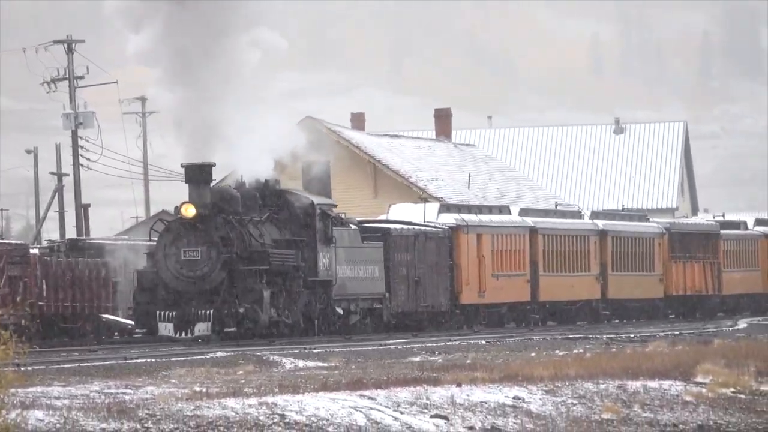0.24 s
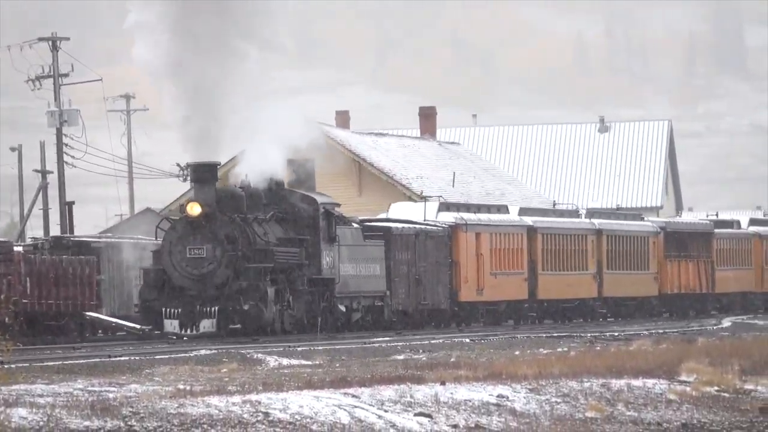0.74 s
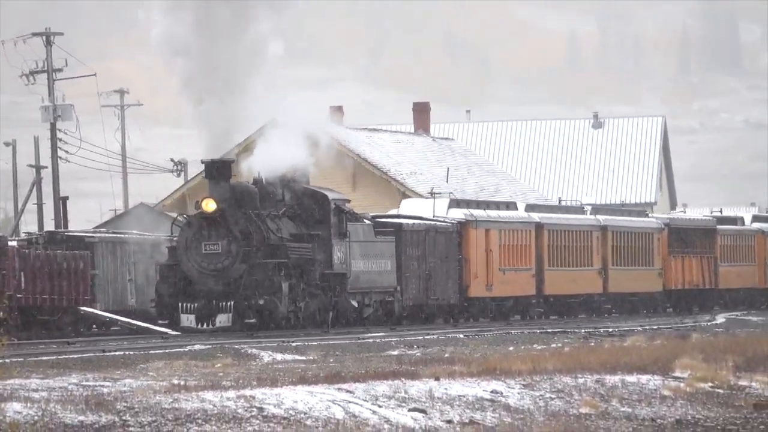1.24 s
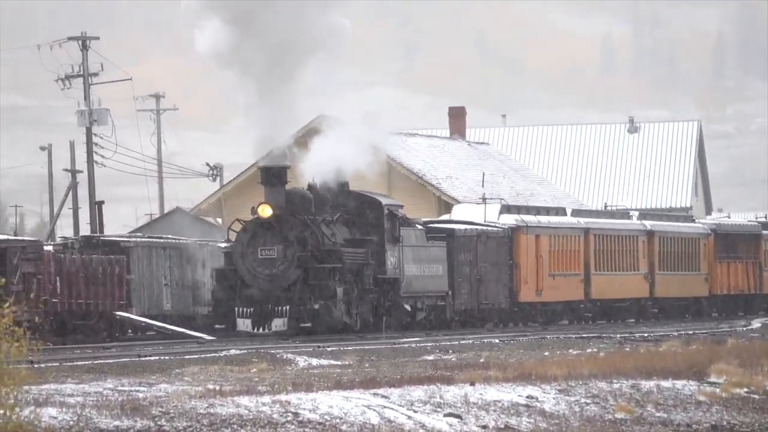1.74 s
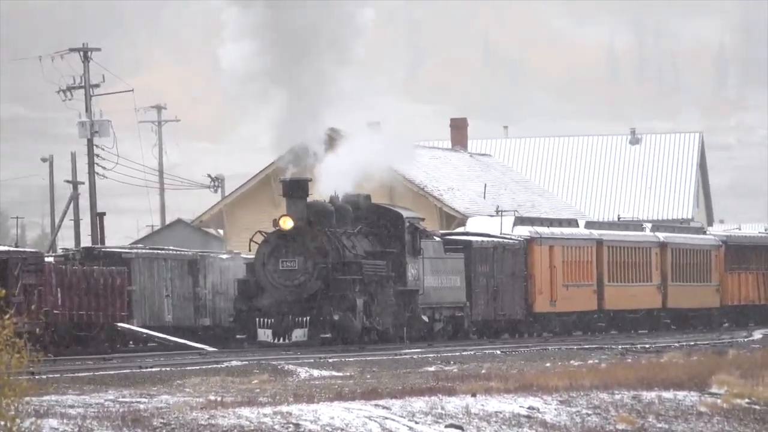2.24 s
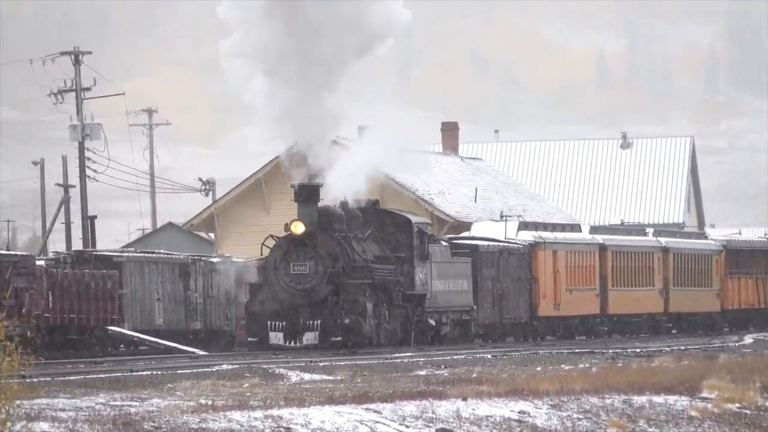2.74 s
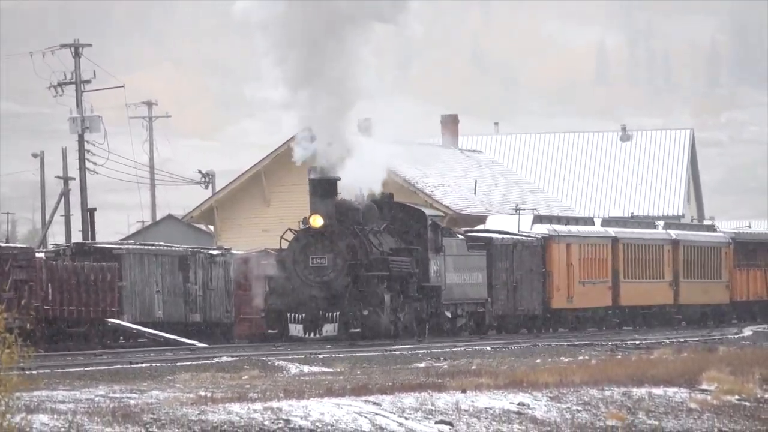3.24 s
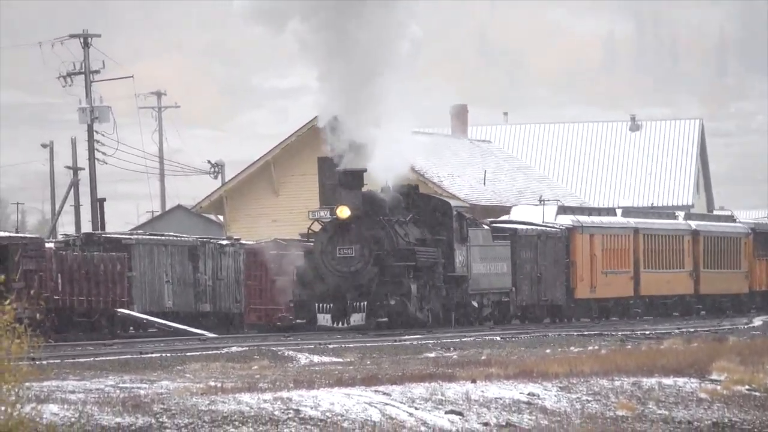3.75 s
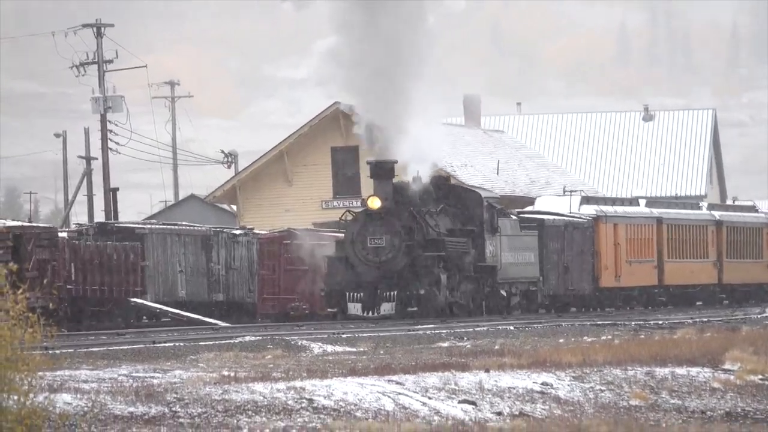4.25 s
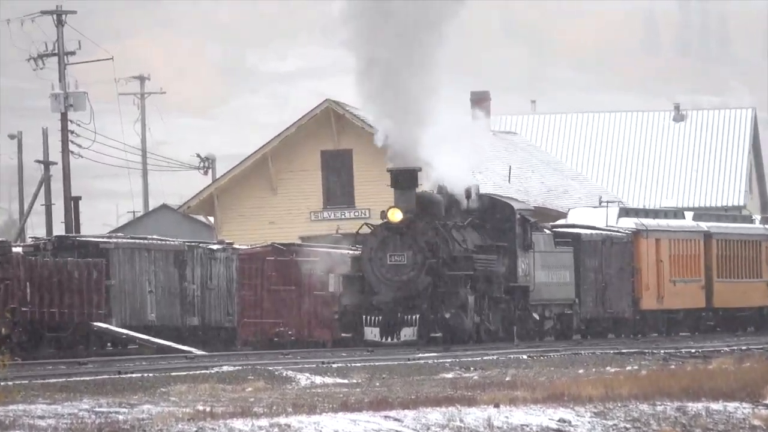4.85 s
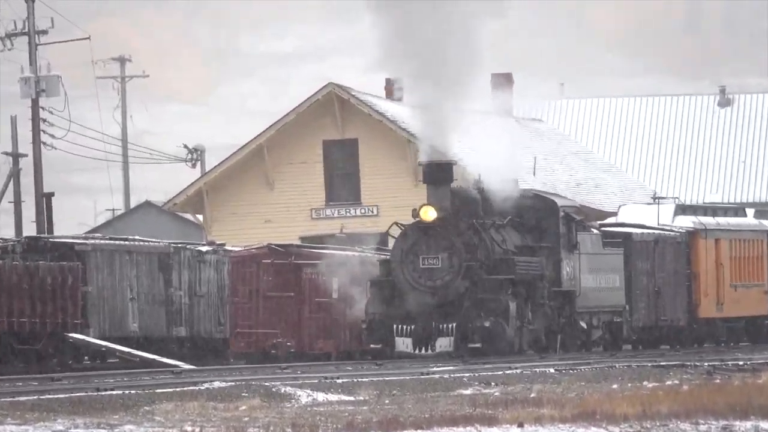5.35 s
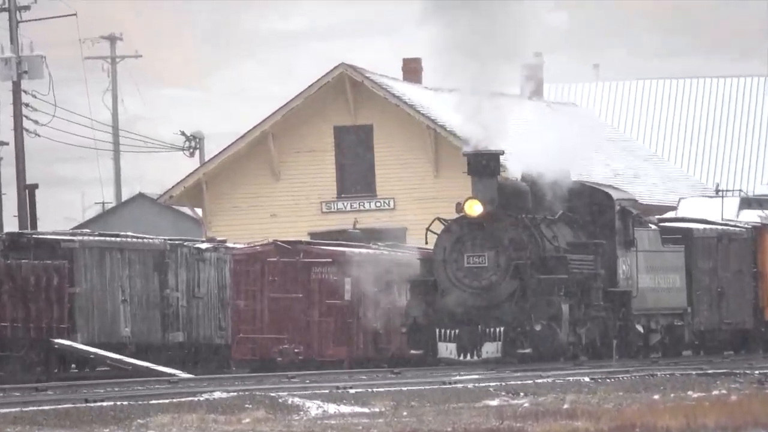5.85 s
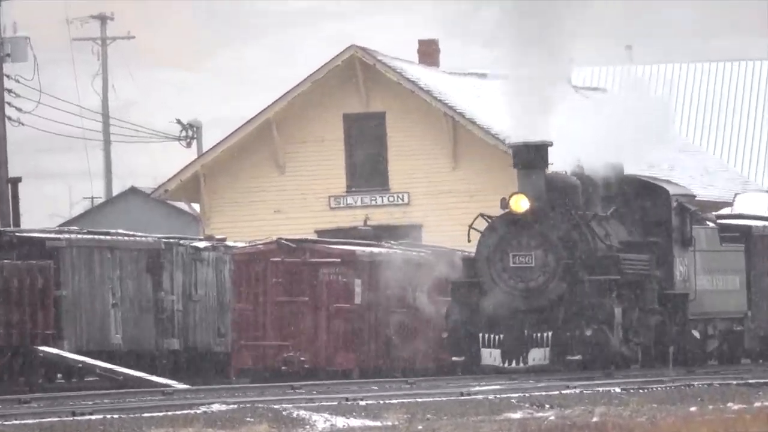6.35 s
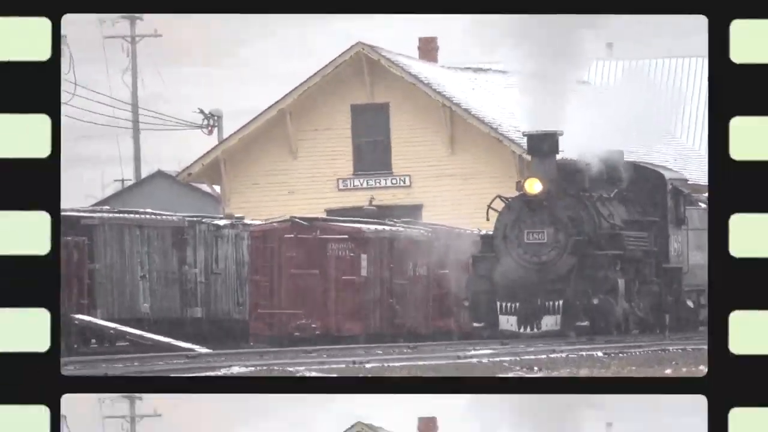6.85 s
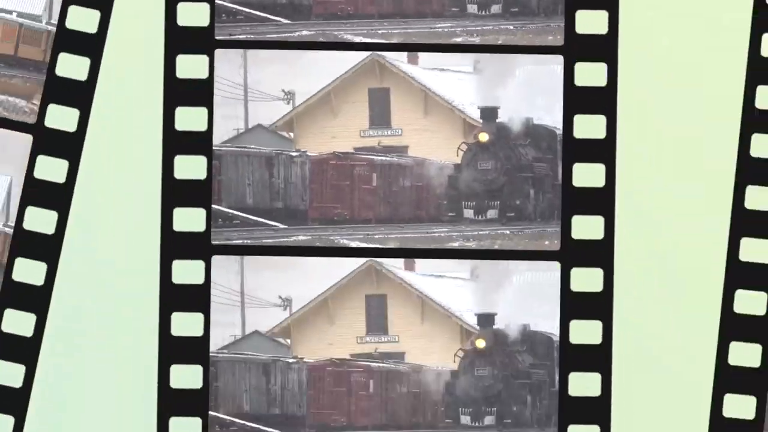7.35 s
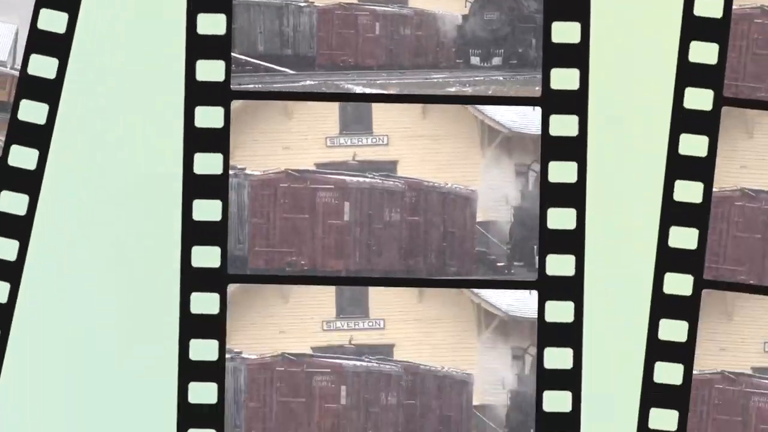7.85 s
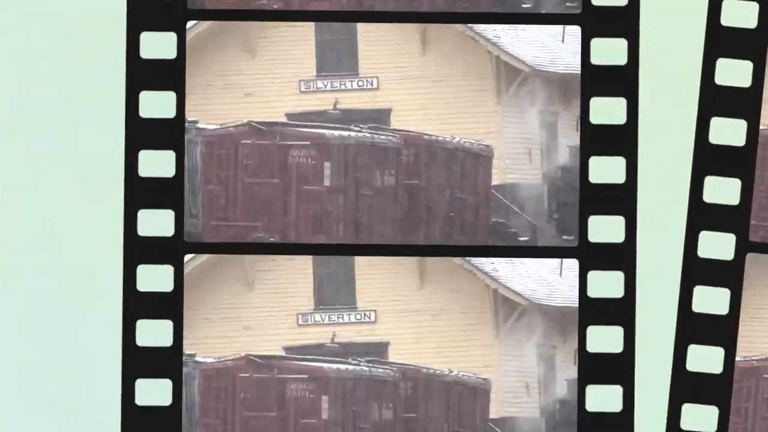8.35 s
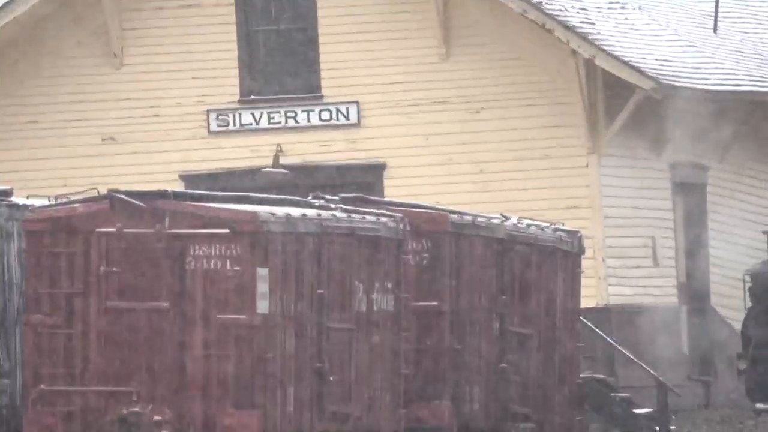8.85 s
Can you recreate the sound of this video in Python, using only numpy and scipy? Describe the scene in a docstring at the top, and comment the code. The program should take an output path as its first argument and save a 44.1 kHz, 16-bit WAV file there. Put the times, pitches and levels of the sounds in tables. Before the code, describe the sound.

Six brisk, limping steam-engine chuffs a second bark outdoors with airy hiss; the hiss thins and the exhaust softens toward the end.

```python
"""Narrow-gauge steam locomotive pulling past a depot

Some way off, about six slightly limping chuffs a second: noise under valve-shaped envelopes barks in the stack,
thumps in the smokebox, rasps at the nozzle and hisses at the rim. Leaking steam, a brief spray and a rumbling
train are coloured noise; wheezing puffs and tiny ticks dot the pull. Ground and wagons reflect the steam.
The hiss thins as the engine draws level, then the blasts dissolve into a later, softer stretch of the pull."""
import sys
import numpy as np
from scipy import signal
from scipy.fft import rfft, irfft
from scipy.io import wavfile
from scipy.ndimage import uniform_filter1d

SR = 44100
rng = np.random.default_rng(int(sys.argv[2]) if len(sys.argv) > 2 else 0)


def transcribe(u):
    """Save the signal u as a 16-bit wav file named by the first command-line argument.

    u: samples, shape (n,) or (channels, n), limited to [-1, 1]; the rate is SR.
    q: integer samples, one column per channel.
    """
    v = np.clip(np.atleast_2d(u).T, -1, 1)
    q = np.round(v * 32767).astype(np.int16)
    wavfile.write(sys.argv[1], SR, q)


N = 401310

# time (s) of every sample, frequency (Hz) of every bin
TIME = np.arange(N) / SR
FREQ = np.maximum(np.arange(N // 2 + 1) * SR / N, 1)

# exhaust strength through the first and the second stretch of the pull, before accents and scatter:
# start_s [s], bark_db [dB], thump_db [dB], hiss_db [dB], rasp_db [dB]
FIRST_STEAM = [(-0.01, -16, -30.5, -26.5, -20), (0.83, -15, -27, -21.5, -31.0),
               (1.35, -16.5, -29, -19.5, -26), (1.84, -14, -25.5, -25, -25.5),
               (2.19, -14.5, -27.5, -25.5, -40), (3.06, -15, -25.5, -19, -25),
               (3.73, -16.5, -35, -22.0, -20), (3.87, -15.5, -30, -25, -20),
               (4.06, -15.5, -31.5, -23.5, -20), (5.22, -16.5, -25.5, -32.5, -23.5),
               (6.56, -18, -24, -41.0, -35.5), (7.09, -17, -26.5, -39.5, -33),
               (7.23, -19.0, -26, -39.5, -38), (7.76, -17, -25.5, -42, -39.0)]
SECOND_STEAM = [(8.02, -24, -25, -46, -31), (8.15, -29.5, -26.5, -43.5, -29.5),
                (8.68, -24.5, -24.0, -35, -27.5), (9.0, -25.5, -24, -36.0, -33)]


def undb(db):
    """Decibels to gain."""
    return 10 ** (np.asarray(db) / 20)


def unit(x):
    """Scale to rms 1."""
    return x / np.sqrt(np.mean(x ** 2))


def curves(table):
    """The columns of a table of (s, ..) rows, drawn as straight lines through every sample."""
    time_s, *columns = np.transpose(table)
    return [np.interp(TIME, time_s, column) for column in columns]


def shape(points):
    """A curve over (Hz, value) points at every frequency, straight on a logarithmic pitch axis."""
    hz, value = np.transpose(points)
    return np.interp(np.log(FREQ), np.log(hz), value)


def colour(x, db):
    """Filter by a gain in dB at every frequency."""
    return irfft(rfft(x) * undb(db), N)


def noise(db):
    """Two unrelated rows of coloured turbulence, rms 1: one for direct sound, one for scattered sound."""
    real, imaginary = rng.standard_normal((2, 2, len(FREQ)))
    return unit(irfft((real + 1j * imaginary) * undb(db), N))


def walk(rate_hz):
    """Random levels, held for 1 / rate_hz and slewed by two running means; spread near 1."""
    hold = int(SR / rate_hz)
    steps = np.repeat(rng.standard_normal(N // hold + 1), hold)
    smooth = uniform_filter1d(uniform_filter1d(steps, hold), hold)
    return 1.22 * smooth[:N]


def strokes(start_s, turn_s, quicken_s, steam, fade_in):
    """Four blasts a wheel turn; rows of (s, opening s, full s, wheeze lead s, bark, thump, hiss, rasp dB)."""
    # blasts of one turn, limping because the valves are set unevenly: share [of a turn],
    # opening_s [s, before scatter], full_s [s from the start of opening], accent_db [dB], wheeze_lead_s [s]
    beats = [(0, .032, .055, 0, .006), (.24, .019, 0.055, -0.02, .026), (0.517, .02, 0.051, 0.63, .026),
             (.723, 0.024, 0.045, -0.5, .004)]
    # the dissolve between the two stretches
    from_s, to_s = 7.08, 8.52
    # no two blasts are quite alike: spread of level (dB) and of opening time (log ratio)
    level_scatter_db, opening_scatter = .5, .15
    steam_s, *steam_db = np.transpose(steam)
    rows = []
    for turn in range(-1, 14):
        for share, opening_s, full_s, accent_db, lead_s in beats:
            turns = turn + share
            # each turn is shorter than the last by quicken_s
            s = start_s + turn_s * turns - quicken_s * turns * (turns - 1) / 2
            mix = np.clip((s - from_s) / (to_s - from_s), 0, 1)
            gain = mix if fade_in else 1 - mix
            louder, slower = rng.standard_normal(2)
            if gain > 0 and -full_s < s < TIME[-1]:
                change_db = accent_db + level_scatter_db * louder + 20 * np.log10(gain)
                levels_db = [change_db + np.interp(s, steam_s, column) for column in steam_db]
                rows.append((s, opening_s * np.exp(opening_scatter * slower), full_s, lead_s, *levels_db))
    return rows


def blasts(chuffs, levels_db, lag_s, decay_db_s, sag_db_s):
    """Flow of all blasts: the valve opens, the cylinder blows down, then the jet dies away."""
    power = np.zeros(N)
    for (s, opening_s, full_s, *_), level_db in zip(chuffs, levels_db):
        # the blast's time lies midway through the opening
        start_s = s - opening_s / 2
        first = int(start_s * SR)
        span = slice(max(0, first), first + SR // 2)
        age = TIME[span] - start_s - lag_s
        valve = np.sin(np.pi / 2 * np.clip(age / opening_s, 0, 1)) ** 1.6
        sag_db = sag_db_s * (np.minimum(age, full_s) - full_s / 2)
        decay_db = decay_db_s * np.maximum(age - full_s, 0)
        power[span] += (valve * undb(level_db - sag_db - decay_db)) ** 2
    return np.sqrt(power)


def exhaust(chuffs, churn_db=0.72, tear_db=0.74, sizzle_db=-14, sizzle_growth=1.78):
    """The jet rings the stack, shoves the air in the smokebox, rasps at the nozzle and hisses at the rim."""
    # resonances of stack and smokebox: pitch_hz [Hz], width_hz [Hz], lift_db [dB]
    resonances = [(362, 33, 1), (585, 19, 6.5), (908, 30, 3.5), (1078, 57, 3), (1274, 224, 5),
                  (1470, 87, 7), (1700, 44, 8), (1910, 84, 6), (2040, 140, 1), (2510, 58, 7)]
    # relative spectra of the jet's layers: pitch_hz [Hz], density_db [dB per Hz]
    bark_colour = [(200, -42), (480, -27), (650, -5.5), (900, -1), (1300, 0), (1700, -1.5), (2100, -3),
                   (2500, -10), (3000, -32), (5000, -35), (9000, -60)]  # before the resonances
    thump_colour = [(20, -58.5), (50, -46), (85, -15.5), (155, -7), (220, -3.5), (300, -4), (380, 1),
                    (470, -9), (650, -3), (1000, -6), (2000, -45), (5000, -73)]  # before the resonances
    rasp_colour = [(1000, -28.5), (1800, 2.5), (2250, 3), (2550, -2.5), (3000, -1), (3500, -6.5),
                   (4200, -10.5), (8000, -56)]
    hiss_colour = [(1000, -30), (2200, 3.5), (3000, -2), (3600, 1), (4300, 2.5), (5400, 0), (6400, -5.5),
                   (7500, -20.5), (9300, -32.5), (11000, -46), (15000, -72)]
    sizzle_colour = [(4000, -33), (6500, 4), (7600, 3.5), (9400, 0.5), (10500, -14.5), (13000, -30),
                     (14500, -52)]

    *_, bark_db, thump_db, hiss_db, rasp_db = np.transpose(chuffs)
    # the stronger the hiss, the faster its topmost sizzle grows
    top_db = bark_db + sizzle_growth * (hiss_db - bark_db) + sizzle_db
    ring_db = sum(lift / (1 + (2 * (FREQ - hz) / width) ** 2) for hz, width, lift in resonances)

    bark = noise(shape(bark_colour) + ring_db)
    bark = bark * blasts(chuffs, bark_db, lag_s=0, decay_db_s=211, sag_db_s=23.5)
    thump = noise(shape(thump_colour) + ring_db)
    thump = thump * blasts(chuffs, thump_db, lag_s=-.001, decay_db_s=148, sag_db_s=40)
    rasp = noise(shape(rasp_colour)) * blasts(chuffs, rasp_db, lag_s=.001, decay_db_s=193, sag_db_s=18)
    hiss = noise(shape(hiss_colour)) * blasts(chuffs, hiss_db, lag_s=.0029, decay_db_s=198.5, sag_db_s=26)
    sizzle = noise(shape(sizzle_colour)) * blasts(chuffs, top_db, lag_s=0, decay_db_s=173, sag_db_s=59)

    # big eddies shake the whole jet, small ones tear at its edge
    churn = undb(churn_db * walk(70))
    tear = undb(tear_db * walk(450))
    return churn * (thump + (bark + rasp + hiss + sizzle) * tear)


def leak(loudest_db=-37, growth=1.33, flutter_db=1):
    """Steam escapes steadily atop the boiler; it swells and thins with the blasts' hiss, only more so."""
    # relative spectrum: pitch_hz [Hz], density_db [dB per Hz]
    leak_colour = [(1500, -5.5), (3000, 4.5), (5000, 7.5), (6500, 1.5), (7600, -4), (9500, -8),
                   (11000, -21), (13000, -25), (14500, -54)]
    _, _, hiss_db, _ = curves(np.vstack([FIRST_STEAM, SECOND_STEAM]))
    level_db = loudest_db + growth * (hiss_db - hiss_db.max())
    return noise(shape(leak_colour)) * undb(level_db + flutter_db * walk(30))


def rolling(swell_db=3.0):
    """Wheels, rods and the fire's draught merge into an uneven rumble."""
    # running gear and coaches, before the swell: start_s [s], level_db [dB]
    rumble_level = [(0, -35.5), (5.5, -36.5), (7.4, -37), (8.2, -39.5), (9.1, -39)]
    # relative spectrum: pitch_hz [Hz], density_db [dB per Hz]
    rumble_colour = [(25, -26), (50, -24.5), (85, -2.5), (125, 0.5), (160, -4.5), (250, 0.5), (360, -4),
                     (490, -3.5), (650, 1.5), (950, 1), (1600, 2), (2200, -2), (3200, -23.5), (5500, -25.5),
                     (8000, -52.5), (14000, -59)]
    level_db, = curves(rumble_level)
    return noise(shape(rumble_colour)) * undb(level_db + swell_db * walk(25))


def yard(x, dull_hz=5500, loss_db=-1.42):
    """Duller copies arrive a few ms after the direct sound and give it a hollow colour that drifts."""
    # early reflections off ground, rails and wagons, before the drift: lag_ms [ms], gain [signed ratio]
    echoes = [(1.547, -.19), (3.011, .14), (3.136, .29), (3.267, .23), (3.737, .34), (3.79, -.33),
              (4.032, .13), (4.474, -.1)]
    # the reflections shift as the engine moves: start_s [s], lag_factor [ratio], strength_factor [ratio]
    drift = [(1.2, 1.017, 1.03), (2.65, .997, .97), (5.1, .996, 1.12), (9.1, .998, .8)]
    stretch, strength = curves(drift)
    dull = colour(x, -10 * np.log10(1 + (FREQ / dull_hz) ** 2))
    bounced = np.zeros(N)
    for lag_ms, gain in echoes:
        bounced += gain * np.interp(TIME - stretch * lag_ms / 1000, TIME, dull)
    return undb(loss_db) * (x + strength * bounced)


def spray(flutter_db=0.5):
    """Wet steam spurts briefly and airily from the top of the boiler."""
    # swell of the spurt, before the flutter: start_s [s], level_db [dB]
    spurt = [(.7, -75), (1.05, -49), (1.45, -50), (1.9, -72)]
    # relative spectrum: pitch_hz [Hz], density_db [dB per Hz]
    airy_colour = [(4000, -12), (7500, 0), (10000, -1), (13000, -9), (14000, -30)]
    level_db, = curves(spurt)
    valve_open = (TIME > spurt[0][0]) & (TIME < spurt[-1][0])
    return noise(shape(airy_colour)) * valve_open * undb(level_db + flutter_db * walk(30))


def ticks(t60_s=0.0059, low_hz=5000):
    """Tiny dry ticks close to the microphone: highpassed noise that dies away within milliseconds."""
    # start_s [s], peak_db [dB]
    tick_list = [(3.29, -21), (8.381, -42), (9.008, -39)]
    out = np.zeros(N)
    age = TIME[:SR // 50]
    highpass = signal.butter(2, low_hz, "high", fs=SR, output="sos")
    for start_s, peak_db in tick_list:
        burst = rng.standard_normal(len(age)) * undb(-60 * age / t60_s)
        tick = signal.sosfilt(highpass, burst)
        start = int(start_s * SR)
        out[start:start + len(age)] += undb(peak_db) * tick / np.abs(tick).max()
    return out


def wheeze(chuffs, centre_hz=2400, width_hz=1100, length_s=.075, fall_hz_s=8000):
    """A worn valve lets a puff slip out ahead of each blast; its pitch sinks as the pressure drops."""
    # heard while the engine draws level, level before the puff's swell: start_s [s], level_db [dB]
    wheeze_level = [(5.599, -50), (6.049, -37.5), (6.55, -39.5), (7.051, -32.5), (7.25, -34.5),
                    (7.599, -46), (8.101, -55)]
    when_s, level_db = np.transpose(wheeze_level)
    out, n = np.zeros((2, N)), int(length_s * SR)
    hz = np.arange(n // 2 + 1) * SR / n
    band = 1 / (1 + (2 * (hz - centre_hz) / width_hz) ** 4)
    # shifts the band from above its centre to below it
    sinking = np.exp(-1j * np.pi * fall_hz_s * (TIME[:n] - length_s / 2) ** 2)
    swell = np.sin(np.pi * np.arange(n) / n)
    for s, _, _, lead_s, *_ in chuffs:
        if when_s[0] < s < when_s[-1]:
            breath = irfft(rfft(rng.standard_normal((2, n))) * band, n)
            puff = unit((signal.hilbert(breath) * sinking).real)
            start = int((s - lead_s - length_s / 2) * SR)
            out[:, start:start + n] += undb(np.interp(s, when_s, level_db)) * puff * swell
    return out


def scene():
    """The engine and its train, nearly straight ahead; scattered sound widens them a little."""
    # share of scattered sound that differs between the sides: pitch_hz [Hz], level_db [dB]
    spread = [(60, -42.5), (150, -60.5), (330, -19), (700, -14.5), (1400, -19.5), (2800, -12.5),
              (5500, -10.5), (10000, -16)]
    first = strokes(start_s=-.011, turn_s=.68118, quicken_s=.00126, steam=FIRST_STEAM, fade_in=False)
    second = strokes(start_s=7.676, turn_s=.66, quicken_s=0, steam=SECOND_STEAM, fade_in=True)
    steam = exhaust(first + second) + leak() + spray()
    unreflected = rolling() + wheeze(first)
    mid = yard(steam[0]) + unreflected[0] + ticks()
    side = colour(steam[1] + unreflected[1], shape(spread))
    return np.array([mid + side, mid - side])


def record(dry, low_cut_hz=50, apart_hz=700, top_hz=13900):
    """The two microphones differ in colour and phase; the deepest bass and the top are cut."""
    # left minus right, before the bass is evened out: pitch_hz [Hz], difference_db [dB]
    port_colour = [(400, -1.5), (1000, 0), (1800, -2), (2500, -4), (3100, -12.5), (4000, 2), (5300, -0.5),
                   (7000, -2), (9500, -1.5)]
    # lead of the left microphone, before the bass is evened out: pitch_hz [Hz], lead_rad [radians]
    port_phase = [(400, -0.026), (950, -0.29), (1460, -0.67), (1980, -0.45), (2410, -1.12), (3530, 0.99),
                  (4130, 0.78), (4500, 0.33), (6500, -1.04), (7300, -1.1), (8200, 0.39)]
    # long waves reach both capsules alike
    apart = FREQ ** 2 / (FREQ ** 2 + apart_hz ** 2)
    # each side takes half the difference, in opposite directions
    left = undb(apart * shape(port_colour) / 2) * np.exp(1j * apart * shape(port_phase) / 2)
    bass_cut = 1 / np.sqrt(1 + (low_cut_hz / FREQ) ** 2)
    pair = irfft(rfft(dry) * np.array([left, 1 / left]) * bass_cut, N)
    return signal.sosfilt(signal.ellip(8, .2, 70, top_hz, fs=SR, output="sos"), pair)


dry = scene()
out = record(dry)
transcribe(out)
```